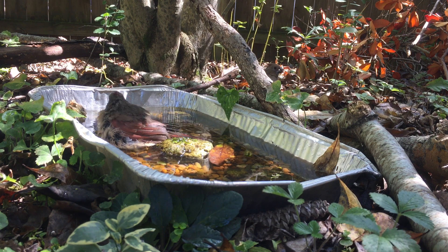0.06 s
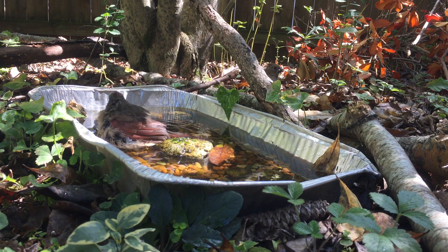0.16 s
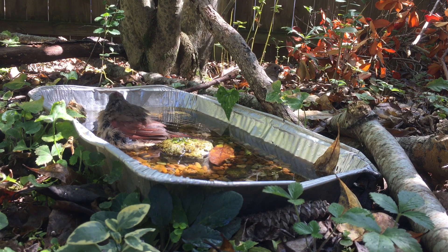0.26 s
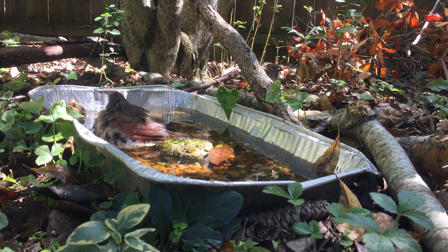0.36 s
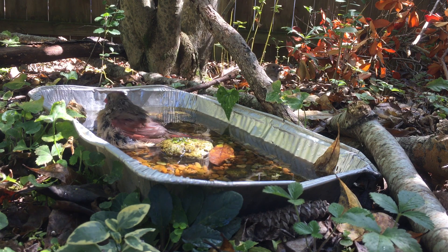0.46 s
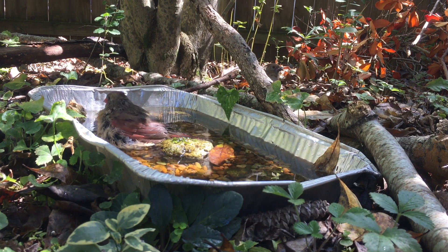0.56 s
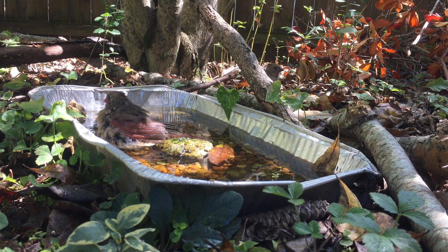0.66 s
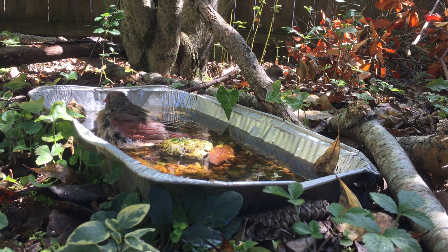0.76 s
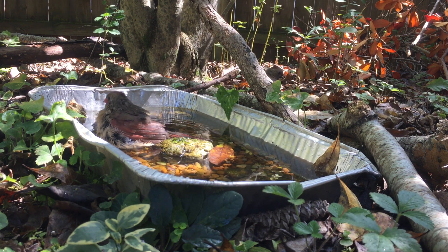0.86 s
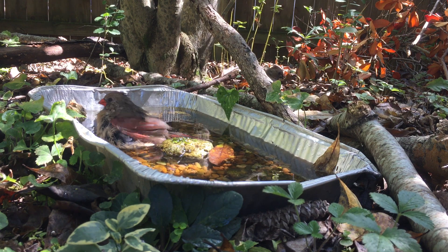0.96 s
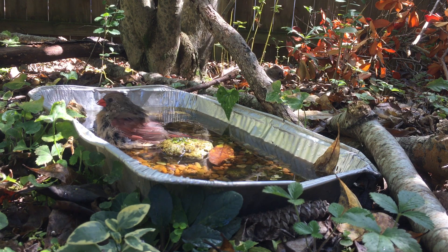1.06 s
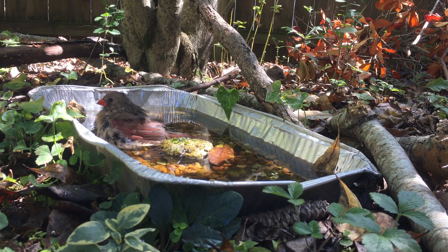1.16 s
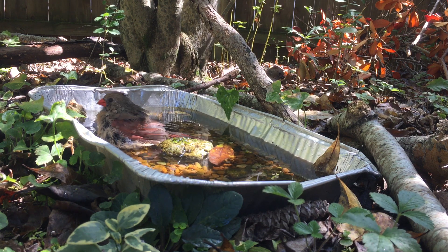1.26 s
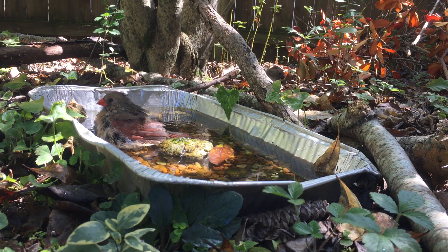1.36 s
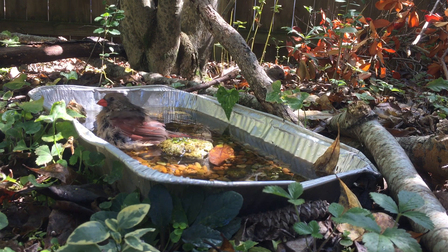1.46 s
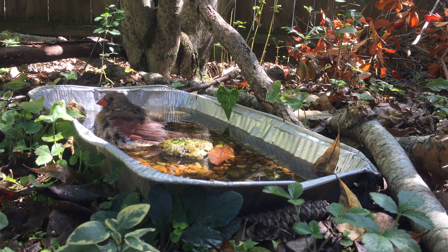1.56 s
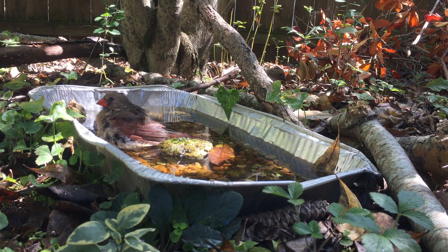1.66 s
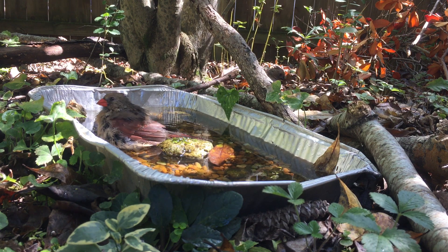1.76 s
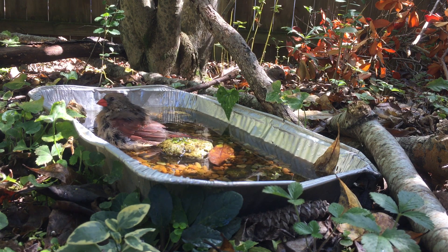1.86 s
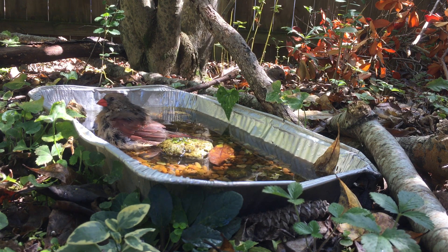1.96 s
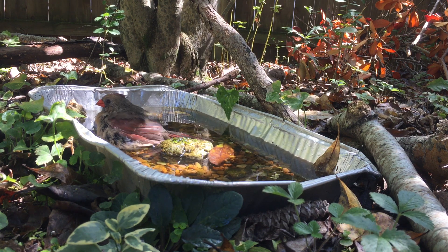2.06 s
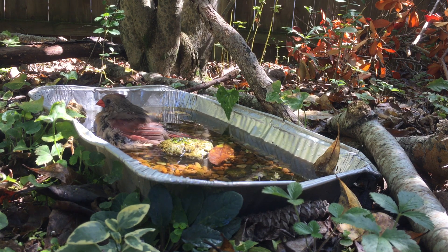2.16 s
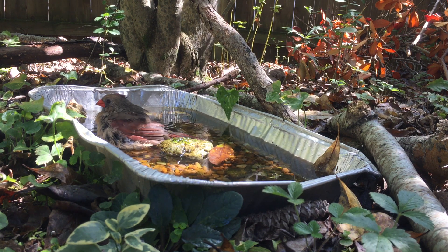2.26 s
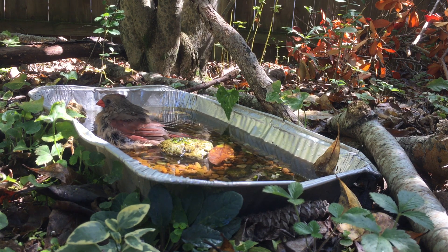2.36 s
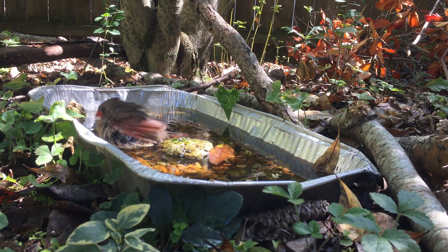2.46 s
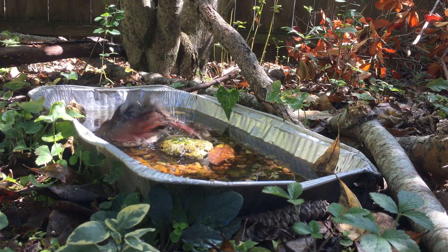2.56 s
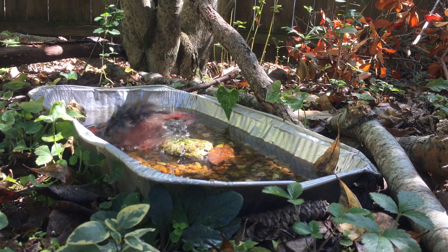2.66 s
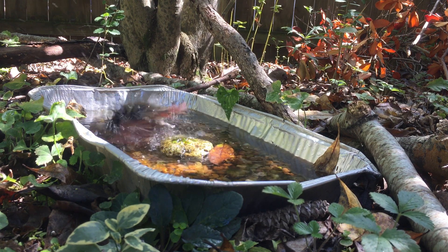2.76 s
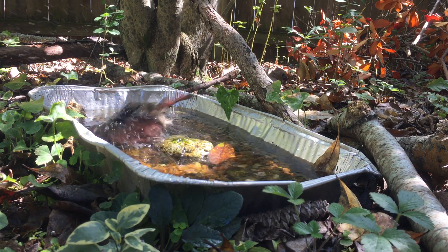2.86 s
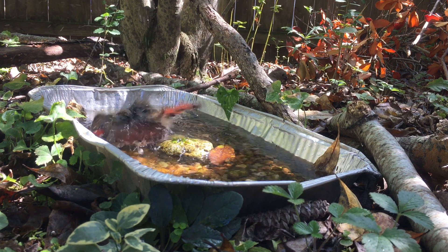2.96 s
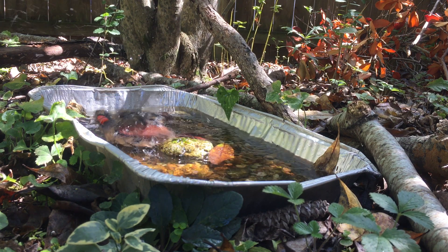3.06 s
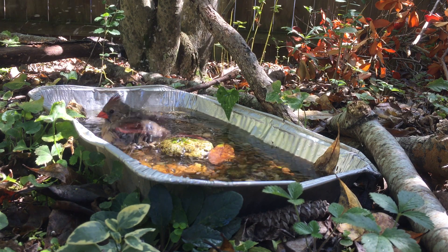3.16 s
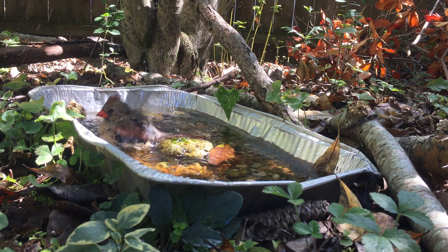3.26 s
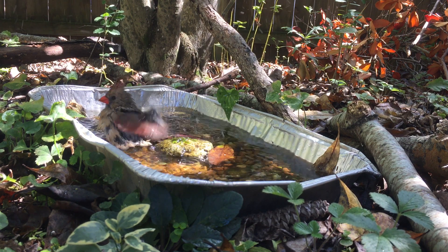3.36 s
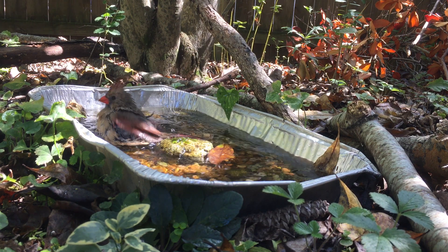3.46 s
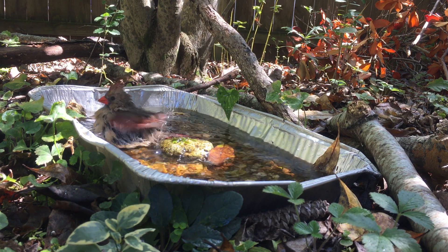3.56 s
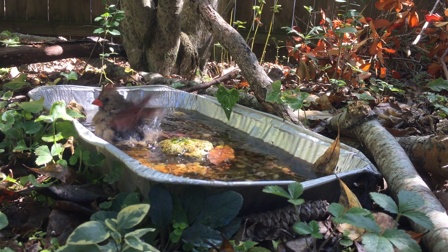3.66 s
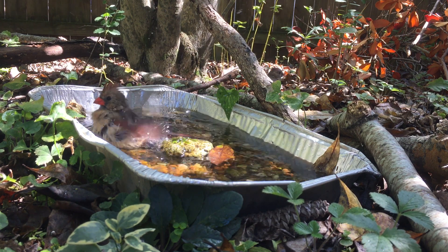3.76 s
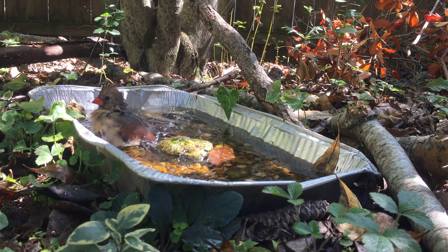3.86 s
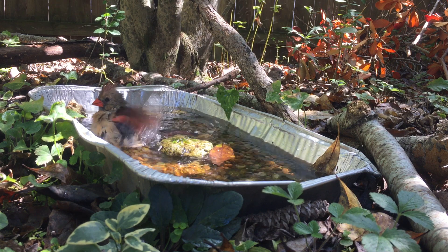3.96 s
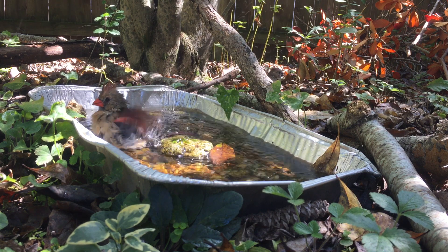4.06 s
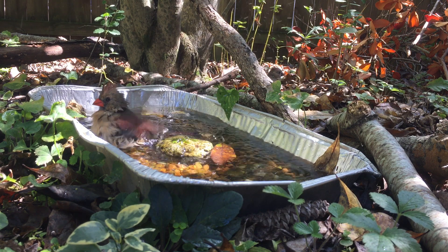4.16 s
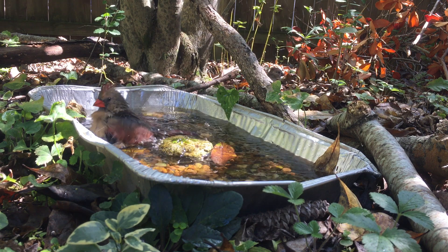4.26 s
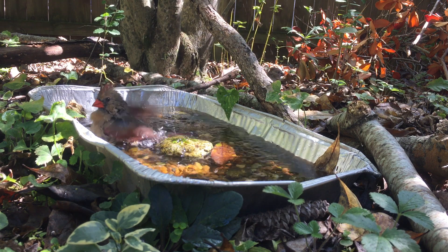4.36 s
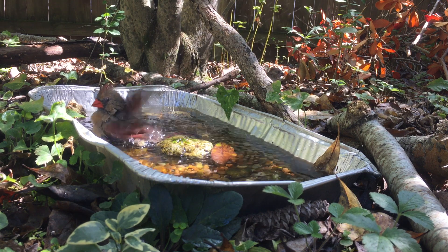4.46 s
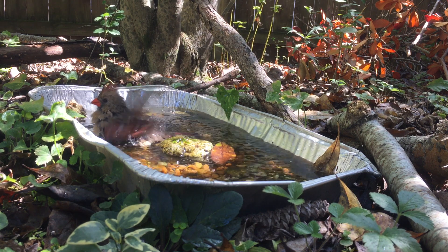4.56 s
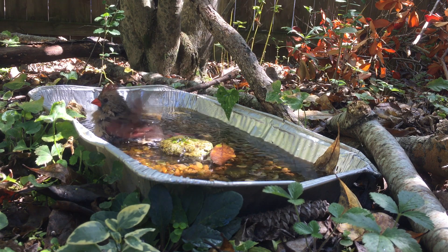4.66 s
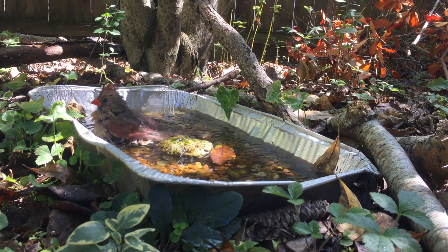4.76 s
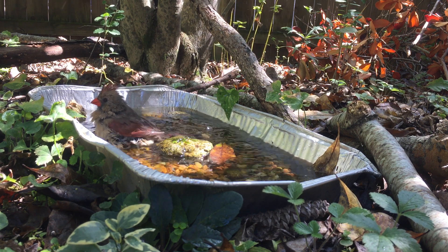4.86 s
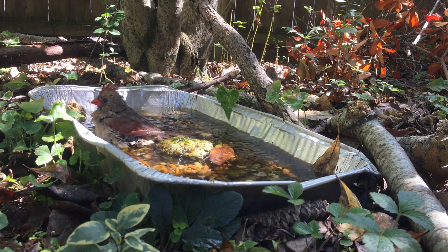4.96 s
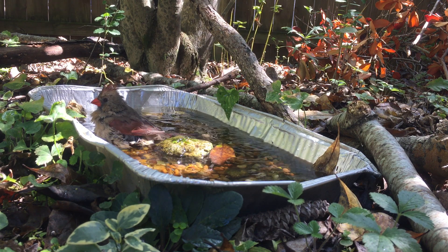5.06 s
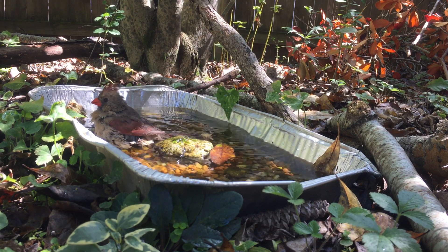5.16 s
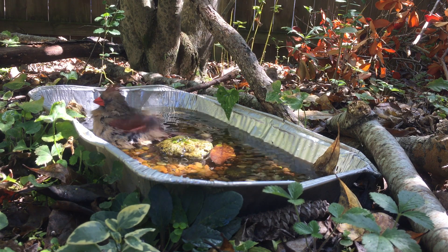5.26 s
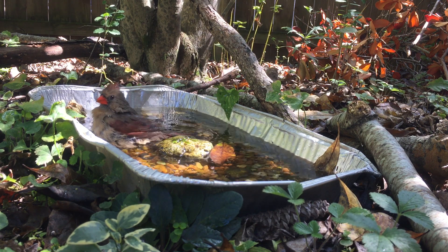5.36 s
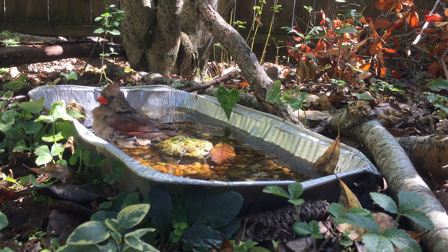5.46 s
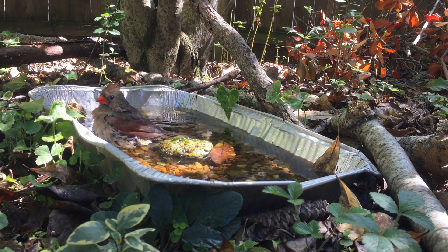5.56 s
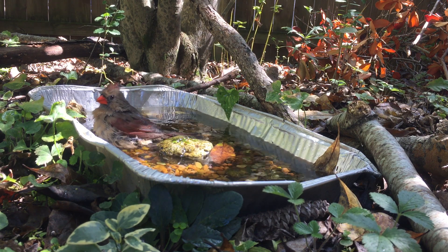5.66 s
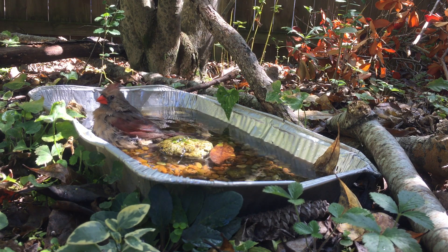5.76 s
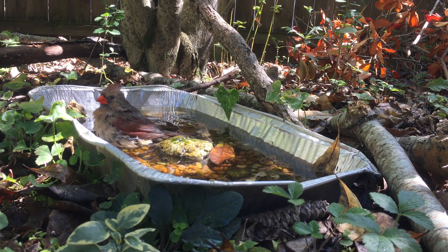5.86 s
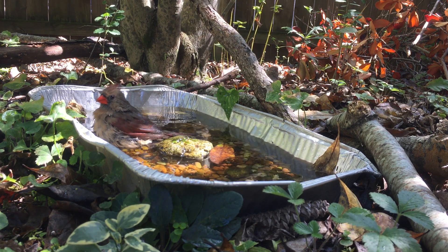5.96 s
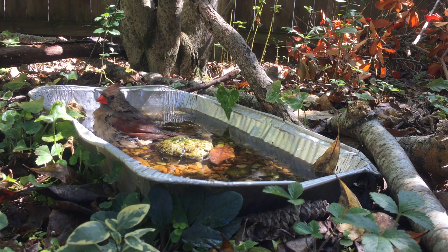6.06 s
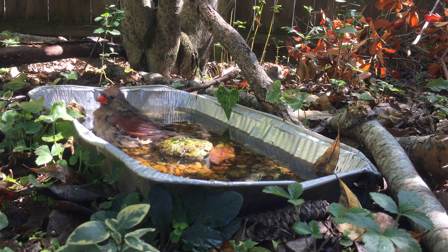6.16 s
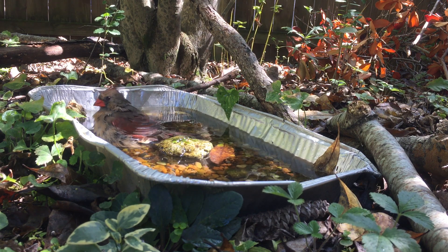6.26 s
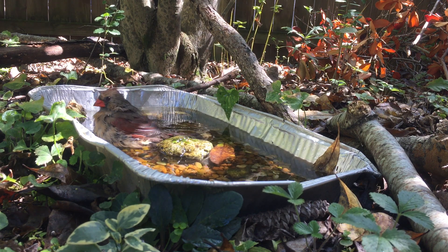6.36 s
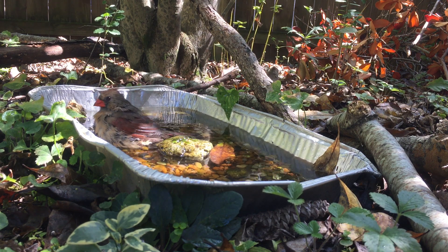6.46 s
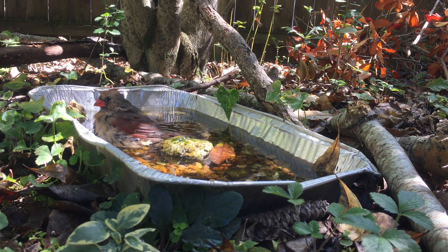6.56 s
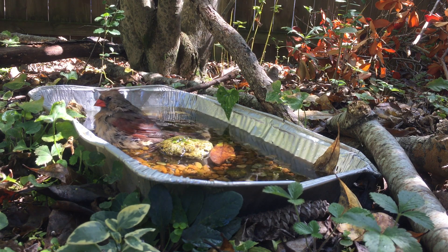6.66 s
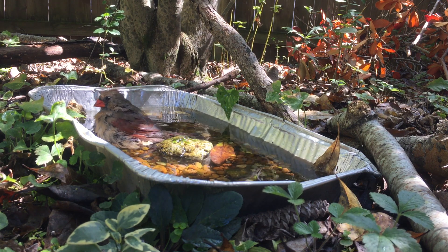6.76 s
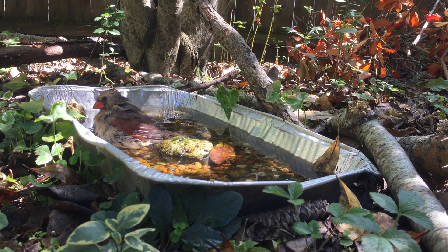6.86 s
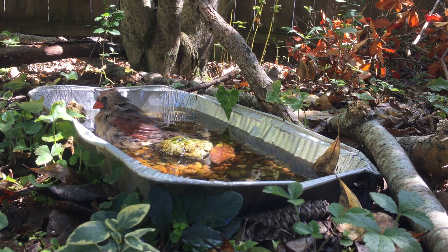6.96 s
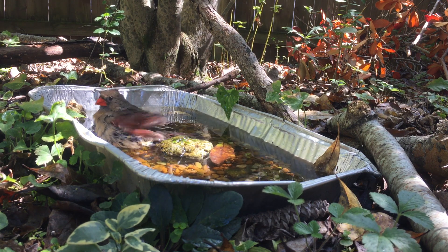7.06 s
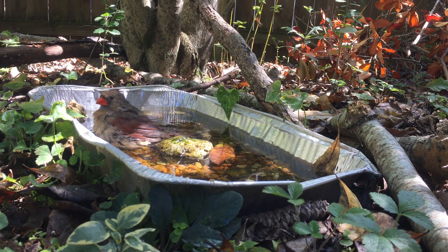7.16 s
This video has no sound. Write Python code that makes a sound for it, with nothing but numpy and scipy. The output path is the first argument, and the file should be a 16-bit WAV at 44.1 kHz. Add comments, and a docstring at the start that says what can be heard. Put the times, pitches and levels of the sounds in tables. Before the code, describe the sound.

Close to a shallow birdbath in a quiet garden, a low throbbing motor drone and soft neighbourhood rumble hold throughout. After nearly three seconds of calm with a tiny drip or two, a bird beats its wings in the water in three rapid flurries, crisp slaps, droplets and small bubbles. A sharp high chip falls between the first two flurries; another follows the last, echoing around the yard.

```python
"""A garden yard, microphone near a shallow birdbath: a cardinal bathes in three flurries of wing beats.
At about 22 beats a second, noise bursts make the slaps; short damped sines make bubbles and low laps;
random ticks and tiny rings make the spray that patters back. Two sharp rising chips, swept sines with an octave,
ring round the yard. Far off a bird whistles once, a short sine; two nearly tuned distant motors drone
with weaker hum tones, over the neighbourhood's low rumble of coloured noise."""
import sys
import numpy as np
from scipy import signal
from scipy.fft import rfft, irfft, next_fast_len
from scipy.io import wavfile
from scipy.ndimage import uniform_filter1d

SR = 44100
rng = np.random.default_rng(int(sys.argv[2]) if len(sys.argv) > 2 else 0)


def wrap_up_sound(samples):
    """Save the sound to the file named by the first command line argument, as 16-bit audio."""
    columns = np.atleast_2d(samples).T
    # keep every value between -1 and 1, then stretch to whole-number steps
    tamed = np.clip(columns, -1, 1)
    steps = np.round(tamed * 32767).astype(np.int16)
    wavfile.write(sys.argv[1], SR, steps)


N = 318402
TIME = np.arange(N) / SR


def undb(db):
    """Decibels to gain."""
    return 10 ** (np.asarray(db) / 20)


def unit(x):
    """Scale to rms 1."""
    return x / np.sqrt(np.mean(x ** 2))


def curve(rows, axis=1):
    """One column of a table, joined by straight lines in time."""
    rows = np.array(rows)
    return np.interp(TIME, rows[:, 0], rows[:, axis])


def colour(x, points):
    """Causal minimum-phase filter through (frequency [Hz], gain [dB]) points."""
    hz, db = np.transpose(points)
    n = len(x)
    bin_hz = np.arange(n + 1) * SR / (2 * n)
    gain_db = np.interp(np.log(bin_hz + 1), np.log(hz), db)
    # folding the cepstrum onto positive time makes the filter causal
    cepstrum = irfft(np.log(undb(gain_db)))[:n]
    cepstrum[1:] *= 2
    response = np.exp(rfft(cepstrum, 2 * n))
    return irfft(rfft(x, 2 * n) * response)[:n]


def noise(points):
    """Steady coloured noise of rms 1."""
    hz, db = np.transpose(points)
    size = next_fast_len(N)
    bin_hz = np.fft.rfftfreq(size, 1 / SR)
    gain = undb(np.interp(np.log(bin_hz + 1), np.log(hz), db))
    spectrum = rfft(rng.standard_normal(size)) * gain
    return unit(irfft(spectrum, size)[:N])


def walk(rate):
    """Smooth random wander of rms 1, from steps at the given rate [Hz] averaged twice."""
    k = int(SR / rate)
    steps = np.repeat(rng.standard_normal(N // k + 1), k)
    return unit(uniform_filter1d(uniform_filter1d(steps, k), k)[:N])


def add(out, s, sound):
    """Mix a sound in at time s [s]."""
    i = max(int(s * SR), 0)
    out[i:i + len(sound)] += sound[:max(N - i, 0)]


# Neighbourhood rumble, far off: (time [s], relative bass level [dB], relative middle level [dB])
RUMBLE_LEVELS = [(0, -62, -53.5), (1.2, -65, -52), (2.4, -67, -53.5), (2.9, -63.5, -51.5), (5.0, -65, -51),
                 (6.2, -59.5, -51), (7.22, -56, -51.5)]
# Colour of the deep rumble: (frequency [Hz], relative level [dB])
DEEP_COLOUR = [(20, -51), (35, -23.5), (55, 6.5), (72, -2), (90, 7.5), (130, -11), (250, -68)]
# Colour of the far traffic: (frequency [Hz], relative level [dB])
TRAFFIC_COLOUR = [(60, -30), (100, 3.5), (210, 2), (290, -2.5), (420, -5), (530, -10.5), (700, -23.5),
                  (1000, -31.5), (2000, -64)]
# Colour of the faint hiss of the yard: (frequency [Hz], relative level [dB])
AIR_COLOUR = [(410, -36), (700, -0.5), (777, -6.5), (841, -4), (958, -0.5), (1770, -3.5), (2700, -8),
              (2920, -8.5), (3160, -9.5), (4050, -7.5), (4730, -14), (6650, -13.5), (7490, -18),
              (8990, -19), (15000, -24.5), (16000, -24)]


def neighbourhood(deep_db=3, gust_db=1.0, traffic_db=-1.0, hiss_db=-70.0, hiss_share=0.72):
    """Deep rumble that comes and goes, far traffic, and a faint hiss that follows the traffic's slow swell."""
    middle_db = curve(RUMBLE_LEVELS, axis=2)
    deep = undb(deep_db + curve(RUMBLE_LEVELS) + gust_db * walk(2.9)) * noise(DEEP_COLOUR)
    traffic = undb(traffic_db + middle_db + 2.4 * walk(30)) * noise(TRAFFIC_COLOUR)
    swell_db = middle_db - np.mean(middle_db)
    hiss = undb(hiss_db + hiss_share * swell_db) * noise(AIR_COLOUR)
    return deep + traffic + hiss


# The stronger of two far motors: (time [s], level [dB], pitch [Hz])
MOTOR_DRONE = [(0, -70, 112.7), (.2, -51, 109.5), (1.3, -54.5, 113.3), (1.9, -46.5, 109.5),
               (2.6, -53.5, 110.3), (3.85, -49, 110.2), (6.0, -52.5, 111.9), (6.2, -45, 106.1),
               (6.6, -51.5, 110), (7.22, -48.5, 110.8)]
# How far the second motor runs below it, the rate of the throb: (time [s], difference [Hz])
MOTOR_SLIP = [(0.0, 2.36), (0.52, 3.8), (1.27, 5.17), (2.65, 3.06), (2.93, 5.57), (3.52, 2.07),
              (3.78, 4.78), (4.43, 3), (4.81, 4.54), (6.07, 3.38), (6.33, 0.85), (6.58, 3.15), (7.22, 4.76)]
# Weaker far hum tones: (mean pitch [Hz], relative level [dB])
HUM_TONES = [(89, -69.5), (119, -64), (133, -57), (146, -66.5), (177.5, -55), (199.5, -60.5), (213, -60),
             (219, -64.5), (243, -65.5), (288, -67.5), (320, -67), (475, -69.5)]
# The hum grows over the first half, then holds nearly steady: (time [s], level change [dB])
HUM_LEVEL = [(0, -5), (1.0, -3), (2.3, 0), (3.5, 1.5), (5.0, 1), (7.22, 1)]


def engine(drone_db=0, second_db=-5.5, hum_db=0, waver=0.45, waver_rate=7):
    """Two far motors, nearly in tune, throb against each other; weaker tones fade in and out on the way."""
    first_hz = curve(MOTOR_DRONE, axis=2)
    second_hz = first_hz - curve(MOTOR_SLIP)
    first = np.sin(2 * np.pi * np.cumsum(first_hz) / SR)
    second = np.sin(2 * np.pi * np.cumsum(second_hz) / SR)
    out = undb(drone_db + curve(MOTOR_DRONE)) * (first - undb(second_db) * second)
    drift = 1 + 0.004065 * walk(1.2)  # all hum tones wander in pitch together
    growth_db = curve(HUM_LEVEL)
    for hz, db in HUM_TONES:
        phase = 2 * np.pi * hz * np.cumsum(drift) / SR
        steady_part = (0.57 + waver * walk(waver_rate)) * np.sin(phase)
        wavering_part = waver * walk(waver_rate) * np.cos(phase)
        out += undb(db + hum_db + growth_db) * (steady_part + wavering_part)
    return np.sqrt(2) * out  # sine levels are rms


# Thin whistle of a far bird: (time [s], peak level [dB], pitch [Hz], length [s])
FAR_WHISTLES = [(1.519, -76, 2950, 0.071)]


def far_bird():
    """A soft level whistle, barely above the hiss: a sine that swells and fades."""
    out = np.zeros(N)
    for s, db, hz, length in FAR_WHISTLES:
        t = np.arange(int(length * SR)) / SR
        swell = np.sin(np.pi * t / length)
        add(out, s, undb(db) * swell * np.sin(2 * np.pi * hz * t))
    return out


def yard(x, wet_db, t60, treble_t60, fence_db, thin_db):
    """Leaves scatter a noise-like tail with its own decay in the treble; the fence sends back one later echo."""
    t = np.arange(int(.7 * SR)) / SR
    scatter = rng.standard_normal(len(t)) * (t > .002)
    low_pass = signal.butter(4, 9500, fs=SR, output="sos")
    low = signal.sosfiltfilt(low_pass, scatter)
    # t60: time [s] for the tail to fall by 60 dB
    tail = low * undb(-60 * t / t60) + (scatter - low) * undb(-60 * t / treble_t60)
    tail = colour(tail / np.linalg.norm(tail), [(5200, thin_db), (7500, 0.004)])
    out = x + undb(wet_db) * signal.fftconvolve(x, tail)[:N]
    add(out, 0.078, undb(fence_db) * x)  # lag of the fence echo [s]
    return out


# Spray thrown up by each flurry: (start time [s], relative level [dB], time it stays thick [s])
FLURRY_SPRAY = [(2.7387, -60, .40), (3.7622, -64.5, .36), (4.4287, -66.5, .31)]
SPRAY_RISE_DB_PER_S, SPRAY_FALL_DB_PER_S, CHURN_FALL_DB_PER_S = 183, 80, 23


def wetness(fall_db_per_s):
    """How much water is in motion: it builds as the bird ducks, holds while it beats hard, then dies away."""
    power = np.zeros(N)
    for start, spray_db, thick_s in FLURRY_SPRAY:
        early = np.maximum(start - TIME, 0)
        late = np.maximum(TIME - start - thick_s, 0)
        level_db = spray_db - SPRAY_RISE_DB_PER_S * early - fall_db_per_s * late
        power += undb(level_db) ** 2
    return np.sqrt(power)


# Colour of the water churning round the bird's body: (frequency [Hz], relative level [dB])
CHURN_COLOUR = [(300, -17), (620, 3.5), (1000, -2.5), (1400, -6.5), (1900, 0), (2600, -4), (5000, -32)]


def churn(churn_db=-9, lump_db=4, lump_rate=110):
    """The stirred water laps in soft, uneven lumps and settles more slowly than the spray."""
    lumps = unit(undb(lump_db * walk(lump_rate)))
    return wetness(CHURN_FALL_DB_PER_S) * undb(churn_db) * lumps * noise(CHURN_COLOUR)


# Colour of splashing water: (frequency [Hz], relative level [dB])
WATER_COLOUR = [(300, -54), (700, -15.5), (1200, -13.5), (1650, -16.5), (2400, -2), (3050, -5),
                (3900, -2.5), (4400, -5), (5000, -13), (6200, -5), (7000, -11.5), (7750, -16.5),
                (9100, -7.5), (9800, -9.5), (10500, -22.5), (11200, -11), (12100, -11.5), (14000, -13.5),
                (16000, -15)]


def patter(rate, spread_db):
    """Countless droplet ticks of very unequal size land at random, rms 1."""
    hit = rng.random(N) < rate / SR
    size = undb(spread_db * np.minimum(rng.exponential(size=N), 4))
    sign = rng.choice([-1, 1], N)
    return unit(colour(hit * size * sign, WATER_COLOUR))


def damped_ring(hz, decay, rise=0.0016, swell_cycles=3.4):
    """A sine that builds over a few cycles, dies away and climbs, as a bubble does nearing the surface."""
    t = np.arange(int(2 * np.pi * decay * SR)) / SR
    ring = np.exp(-t / decay) * (1 - np.exp(-t * hz / swell_cycles))
    phase = 2 * np.pi * hz * t * (1 + rise * t / decay / 2)
    return np.sin(phase) * ring / ring.max()


def spray(tick_db=0, fizz_db=-3, stray_db=-5, shower_db=3.0, cycles=4, spread_db=2.5, count=1600):
    """Thrown water patters back, with sparser stray drops, and some droplets leave tiny ringing bubbles."""
    start, end = FLURRY_SPRAY[0][0] - .2, FLURRY_SPRAY[-1][0] + .6
    fizz = np.zeros(N)
    for when, pitch, size, ring in rng.random((count, 4)):
        hz = 1500 * 8.0 ** pitch
        gain = undb(-spread_db * np.log(size + 0.016)) * hz ** 0.8  # longer rings start softer
        add(fizz, start + when * (end - start), gain * damped_ring(hz, (.5 + ring) * cycles / hz))
    # rms 1 over the wet stretch rather than over the whole sound
    fizz = unit(colour(fizz, WATER_COLOUR)) * np.sqrt((end - start) * SR / N)
    fine = undb(tick_db) * patter(rate=1500, spread_db=1.5)
    stray = undb(stray_db) * patter(rate=160, spread_db=2.0)
    showers = unit(undb(shower_db * walk(130)))  # it comes down in handfuls
    return wetness(SPRAY_FALL_DB_PER_S) * showers * (fine + stray + undb(fizz_db) * fizz)


# Sharp cracks of water, from wing slaps and big drops: (time [s], relative level [dB], brightness [0-1])
WATER_CRACKS = [(.521, -52, .6), (2.1668, -48, 0.3), (2.642, -47, 0), (2.6811, -38, 0), (2.705, -41, .6),
                (2.8266, -20.5, 1), (2.8754, -32, 0.3), (2.996, -34, 0.5), (3.1048, -32, 0),
                (3.1301, -21.5, 0.62), (3.17, -28, 0.3), (3.251, -54, .6), (3.369, -43, 0.68),
                (3.4215, -42, .3), (3.4428, -41, 0), (3.503, -41.5, .95), (3.755, -34, .3),
                (3.8035, -35, 0.3), (3.9006, -20.5, .55), (3.9505, -32, 0.8), (4.3715, -40, 0.65),
                (4.5115, -30, 0.5), (4.559, -40, 0.6), (4.649, -33, .95), (4.688, -35, 1), (4.698, -32, .9),
                (4.734, -38, 1), (4.968, -48, .8), (5.065, -46, 1), (5.243, -46, .9)]


def cracks(crack_db=0, decay_s=0.00083):
    """Wing slaps and big drops crack the water: noise about a millisecond long, some dull, some bright."""
    out, t = np.zeros(N), np.arange(SR // 100) / SR
    for s, db, bright in WATER_CRACKS:
        crack = np.exp(-t / decay_s) * rng.standard_normal(len(t))
        crack = signal.lfilter([1, -bright], [1], crack)
        add(out, s, undb(db + crack_db) * crack)
    return colour(out, WATER_COLOUR)


# Short damped rings: bubbles, low laps, and one dull wing beat:
# (time [s], relative level [dB], pitch [Hz], decay time [s])
SHORT_RINGS = [(.525, -59, 737, 0.0071), (2.158, -56, 3586, 0.0013), (2.6566, -43, 2700, 0.00088),
               (3.0496, -44.5, 2686, 0.0033), (3.155, -39, 3750, 0.0023), (3.1934, -46, 2820, 0.0013),
               (3.2187, -45, 2310, 0.003), (3.283, -54, 3730, .001), (3.352, -60, 855, .002),
               (3.508, -56, 695, 0.0018), (3.651, -41, 3400, 0.00032), (3.657, -48, 2700, 0.00057),
               (3.898, -39, 4160, 0.0018), (4.0822, -28, 3580, 0.0011), (4.093, -35.5, 6050, 0.0007),
               (4.1695, -34, 2470, 0.0005), (4.292, -52, 2680, 0.0022), (4.735, -48, 4100, .001),
               (5.1445, -47.5, 2250, .0005), (5.1457, -47.5, 3900, 0.0003), (5.164, -53, 2600, 0.00037)]


def short_rings(ring_db=-2, stray_db=-29, cycles=3, count=30):
    """Short damped rings: bubbles, low laps and one dull wing beat, plus random bubbles in the stirred water."""
    out, stirred = np.zeros(N), np.sqrt(wetness(CHURN_FALL_DB_PER_S))
    for s, db, hz, decay in SHORT_RINGS:
        add(out, s, undb(db + ring_db) * damped_ring(hz, decay))
    start, end = FLURRY_SPRAY[0][0], FLURRY_SPRAY[-1][0] + .45
    for when, pitch, size in rng.random((count, 3)):
        s, hz = start + when * (end - start), 2200 * 3.0 ** pitch
        gain = np.interp(s, TIME, stirred) * undb(stray_db + 10 * size)
        add(out, s, gain * damped_ring(hz, cycles / hz))
    return out


def burst(envelope, points, spread_db):
    """A cluster of unequal ticks, coloured, with the energy of its envelope."""
    size = undb(spread_db * rng.standard_normal(len(envelope)))
    ticks = rng.standard_normal(len(envelope)) * size
    return unit(colour(envelope * ticks, points)) * np.sqrt(np.mean(envelope ** 2))


def spatter(envelope, rate, spread_db, mist_db=-20):
    """Separate droplet ticks in a fine mist, with the energy of their envelope."""
    size, mist = rng.standard_normal((2, len(envelope)))
    hit = rng.random(len(envelope)) < rate / SR
    ticks = hit * np.sign(mist) * undb(spread_db * size) + undb(mist_db) * mist
    return unit(colour(envelope * ticks, WATER_COLOUR)) * np.sqrt(np.mean(envelope ** 2))


def stroke_colour(pocket_hz, pocket_db=2, pocket_octaves=0.4, contrast=1.0, scatter_db=2.0, dull_db_per_octave=1.1):
    """Every stroke stirs the basin's resonances in its own proportions, and its own air pocket stands out."""
    hz, db = np.transpose(WATER_COLOUR)
    octaves = np.log2(hz / pocket_hz)
    stirred_db = contrast * db + scatter_db * rng.standard_normal(len(hz))
    bump_db = pocket_db * np.exp(-(octaves / pocket_octaves) ** 2)
    dulling_db = dull_db_per_octave * np.maximum(octaves, 0)  # the splash falls off above its pocket
    return np.transpose([hz, stirred_db + bump_db - dulling_db])


# Wing beats on the near water: (time [s], relative splash level [dB], relative slosh level [dB],
# decay time [s], pitch of the air pocket [Hz])
WING_BEATS = [(2.7385, -43.5, -42, 0.0048, 3540), (2.786, -47.5, -49.5, 0.0049, 3540),
              (2.838, -48, -58, 0.0064, 2400), (2.878, -41.5, -50, 0.0017, 2400),
              (2.8884, -46, -46, 0.0031, 3070), (2.93, -51.5, -56, .004, 2800),
              (2.981, -50.5, -64, 0.0025, 5900), (3.03, -53, -57, 0.0064, 3800),
              (3.089, -48, -47, 0.0035, 2730), (3.144, -50.5, -69, 0.0039, 2920),
              (3.18, -57, -47, 0.0031, 2500), (3.7623, -46.5, -44, 0.0039, 3380),
              (3.807, -49, -48, 0.0046, 2870), (3.855, -46.5, -55, 0.0036, 2780),
              (3.9009, -37, -47, 0.0011, 4140), (3.943, -49, -50, 0.0047, 3900),
              (3.987, -42.5, -42.5, 0.0033, 2310), (4.033, -35.5, -61, 0.0013, 4030),
              (4.082, -42, -54, 0.0019, 3660), (4.123, -49, -50.5, .004, 2880),
              (4.1718, -43, -54, .0022, 2590), (4.224, -53, -56, 0.0037, 2520),
              (4.275, -54.5, -52, 0.0049, 2660), (4.327, -56.5, -49, 0.0091, 3383),
              (4.38, -54, -65, 0.0048, 3370), (4.429, -46, -40.5, 0.0024, 2410),
              (4.475, -38.5, -47, 0.0019, 2800), (4.521, -40, -45, 0.0022, 3900),
              (4.567, -44, -43.5, 0.0025, 3830), (4.6106, -42.5, -42.5, 0.0025, 2720),
              (4.656, -38, -41, 0.0014, 4050), (4.7064, -48.5, -48, 0.0027, 4120),
              (4.7551, -44.5, -47, 0.0026, 2275), (4.8073, -47, -57, 0.004, 4090),
              (4.863, -55, -51, 0.0041, 3200), (5.397, -54.5, -46, 0.0024, 4240)]


def gurgles(gurgle_db=-10, count=5, pocket_cycles=2.2):
    """Each wing folds a few pockets of air under the surface; the churning water damps them at once."""
    out = np.zeros(N)
    draws = rng.random((len(WING_BEATS), count, 3))
    for (s, db, low_db, length, _), pockets in zip(WING_BEATS, draws):
        for k, (when, pitch, size) in enumerate(pockets):
            small = (k + pitch) / count  # big pockets go with the slosh, small ones with the splash
            hz = 550 * 14.0 ** small
            level_db = (1 - small) * low_db + small * db - 8 * size
            ring = damped_ring(hz, pocket_cycles / hz)
            add(out, s + (4 * when - 1) * length, undb(gurgle_db + level_db) * ring)
    return out


# Colour of the water shoved aside by a wing: (frequency [Hz], relative level [dB])
SLOSH_COLOUR = [(200, -3), (380, 4.5), (650, 1.5), (1000, -6), (1500, -15), (2500, -50), (5000, -54)]


def wings(splash_db=1, slosh_db=0, rake_db=-54.5, rake_follow=0.56, rake_bright=0.57, wash_db=-61,
          rake_s=.012, skirt_db=-20, skirt_s=0.0061, slosh_rise_s=0.0018, slosh_s=0.003):
    """Each wing rakes the water with a crackle and a low wash, then slaps it, over the thump of shoved water."""
    out = np.zeros(N)
    lead = .06  # each stroke is drawn this long [s] before and after its slap
    t = np.arange(-lead, lead, 1 / SR)
    rake = np.exp(-np.abs(2 * t / rake_s + 1) ** 4)  # feathers rake for about rake_s before the slap
    usual_db = np.mean(np.array(WING_BEATS)[:, 1])
    for s, db, low_db, decay, pocket_hz in WING_BEATS:
        skirt = undb(skirt_db) * np.exp(-np.abs(t) / skirt_s)
        slap = np.maximum(np.exp(-np.abs(t) / decay), skirt)
        shove = np.exp(np.minimum(t / slosh_rise_s, -t / slosh_s))
        force_db = rake_follow * (db - usual_db)
        crackle = signal.lfilter([1, -rake_bright], [1], spatter(rake, rate=1100, spread_db=8))
        wash = burst(rake, CHURN_COLOUR, spread_db=1.5)
        splash = burst(slap, stroke_colour(pocket_hz), spread_db=8.0)
        thump = burst(shove, SLOSH_COLOUR, spread_db=2.5)
        add(out, s - lead, undb(rake_db + force_db) * crackle)
        add(out, s - lead, undb(wash_db + force_db) * wash)
        add(out, s - lead, undb(db + splash_db) * splash)
        add(out, s - lead, undb(low_db + slosh_db) * thump)
    return out


# Chip calls: (time [s], relative level [dB], start pitch [Hz], top pitch [Hz], length [s],
# octave level away from its flash, relative to the whistle [dB])
CHIP_CALLS = [(3.574, -38, 5170, 7870, 0.042, -19.5), (5.5358, -39, 5394, 8214, 0.052, -20)]


def chips(crest=0.75, bend=0.75, attack_s=0.0021, fade_s=0.003, hold=0.38, shrill_db=10, shrill_hz=14600,
          flutter=0.01):
    """A pure whistle that starts hard, arches up and droops as it fades; its octave flashes near shrill_hz."""
    whistle, overtone = np.zeros((2, N))
    for s, db, start_hz, top_hz, length, octave_db in CHIP_CALLS:
        t = np.arange(int(length * SR)) / SR
        arch = np.sin(np.pi / 2 * (t / length / crest) ** bend)
        hz = (start_hz + (top_hz - start_hz) * arch) * (1 + flutter * walk(940)[:len(t)])
        phase = 2 * np.pi * np.cumsum(hz) / SR
        attack = np.minimum(t / attack_s, 1) ** 2
        fade = (np.exp(-t / fade_s) + hold) * (1 - t / length)
        force = undb(db) * attack * fade
        flash_db = shrill_db * np.exp(-((2 * hz - shrill_hz) / 900) ** 2)
        add(whistle, s, force * np.sin(phase))
        add(overtone, s, force * undb(octave_db + flash_db) * np.sin(2 * phase))
    return whistle, overtone


def scene(off_axis_db=-6):
    """Near water almost dry; chips fill the yard, their octave beamed away and heard mostly off the leaves."""
    bath = wings() + gurgles() + churn() + spray() + cracks() + short_rings()
    water = yard(bath, wet_db=-9, t60=.12, treble_t60=0.14, fence_db=-33, thin_db=-5)
    whistle, overtone = chips()
    calls = yard(whistle, wet_db=4.5, t60=0.6, treble_t60=0.23, fence_db=-8, thin_db=-12.0)
    octave = yard(overtone, wet_db=9.0, t60=0.42, treble_t60=0.29, fence_db=-20, thin_db=2)
    shrill = undb(off_axis_db) * octave
    return (water + calls + shrill + far_bird() + engine() + neighbourhood())[None]


def record(dry, bass_hz=30, top_hz=15650):
    """The microphone end cuts the deepest bass gently and the highest treble steeply."""
    high_pass = signal.butter(4, bass_hz, "highpass", fs=SR, output="sos")
    low_pass = signal.ellip(10, .2, 70, top_hz, fs=SR, output="sos")
    lean = signal.sosfilt(high_pass, dry)
    return signal.sosfilt(low_pass, lean)


dry = scene()
out = record(dry)
wrap_up_sound(out)
```